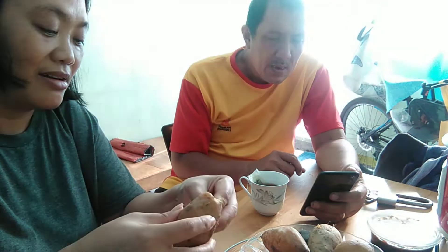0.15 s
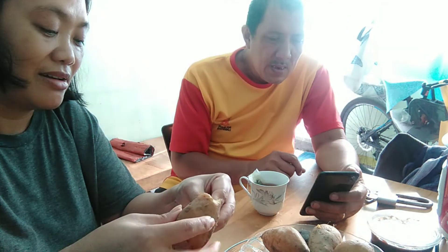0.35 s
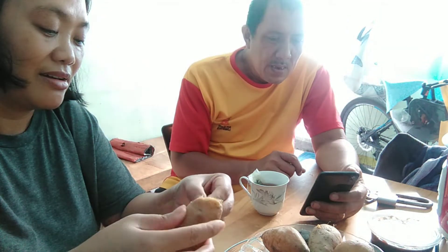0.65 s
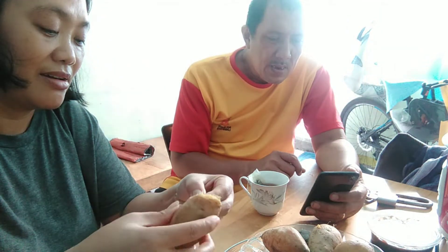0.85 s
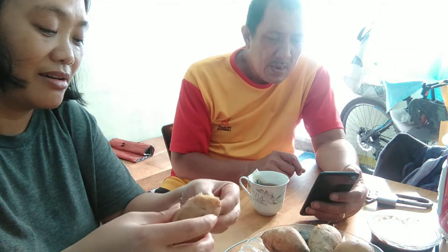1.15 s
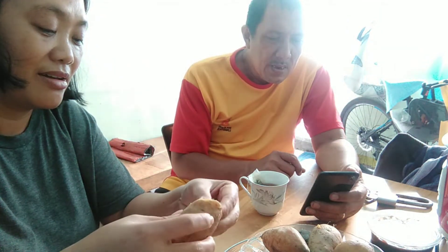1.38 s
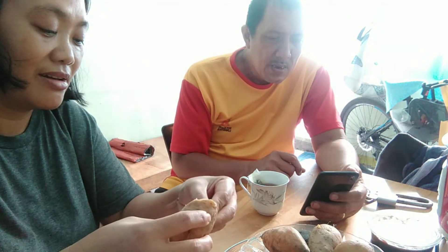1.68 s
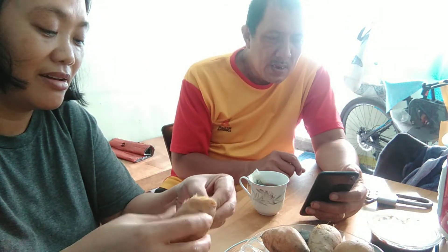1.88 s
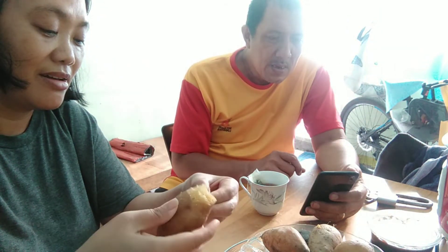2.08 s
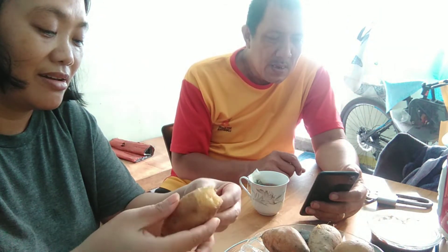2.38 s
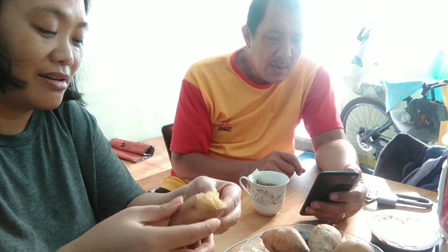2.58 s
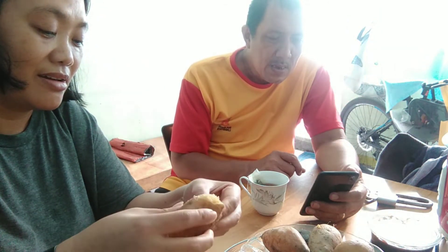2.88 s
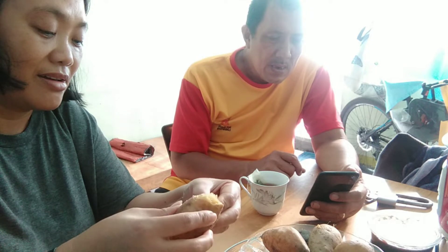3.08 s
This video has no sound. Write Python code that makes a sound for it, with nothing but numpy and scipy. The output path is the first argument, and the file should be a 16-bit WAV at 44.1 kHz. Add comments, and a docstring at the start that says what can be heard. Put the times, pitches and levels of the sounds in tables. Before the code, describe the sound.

A sweet potato being peeled by hand, soft close rustles over a faint room hum.

```python
"""A dry, finely grained hiss comes in strokes: fingers rub and peel the skin off a sweet potato,
at a table in a small room, close to one microphone. The hiss is countless tiny slips of skin on peel,
swelling with pressure and thinning as it eases. A few pushes rasp or scuff; one starts with a tiny
snap and ends in a duller scuff. Behind the hands, a low rumble and a faint hum fill the room."""
import sys
import numpy as np
from scipy import signal
from scipy.fft import rfft, irfft
from scipy.io import wavfile

SR = 44100
rng = np.random.default_rng(int(sys.argv[2]) if len(sys.argv) > 2 else 0)


def store_wav(level_fs):
    """Save 16-bit WAV to argv[1]."""
    pcm = np.round(np.clip(np.atleast_2d(level_fs), -1, 1) * 32767)
    wavfile.write(sys.argv[1], SR, pcm.T.astype(np.int16))


N = 143325

# Skin sliding on peel, heard close up. Each row: frequency in Hz, relative level in dB.
RUB_SPECTRUM = [(500, -15), (1400, -12), (1700, -12.5), (1900, -8), (2300, -9.5), (2850, -9), (3400, -7),
                (4500, -5), (6400, -5.5), (7200, -3), (7450, 0.5), (8450, 1.5), (9300, -4.5), (10300, -9.5),
                (13000, -18.5), (15700, -24)]
# The strokes of the fingers. Each row: start, rise and hold in seconds, fade in dB per second,
# level on gripping and on letting go in dB before thinning, low edge at full pressure in Hz.
FINGER_STROKES = [(-.06, 0.031, 0.047, 90, -53, -52.5, 1670), (0.123, 0.036, 0.099, 68, -46, -40.5, 1570),
                  (0.344, 0.086, 0.095, 39, -48, -47.5, 1710), (0.67, 0.048, .13, 85, -45.5, -42, 1550),
                  (0.902, 0.14, 0.053, 81, -45.5, -47, 1570), (1.249, 0.039, 0.17, 64, -46, -46, 1620),
                  (1.488, 0.056, 0.077, 19, -47.5, -46.5, 1570), (1.867, 0.06, 0.051, 52, -44, -46, 1340),
                  (2.102, .11, 0.09, 73, -49, -50.5, 2400), (2.479, 0.048, .11, 51.5, -45, -44, 1480),
                  (2.614, 0.032, 0.038, 146, -42.5, -42.5, 1180), (2.78, .11, 0.13, 51, -47, -47.5, 1660),
                  (3.221, 0.07, .05, 80, -46.5, -54, 4500)]
def rubbing():
    """The fingers slide over the peel, each stroke with its own pressure."""
    return sum(stroke(pressure(*gesture), edge_hz) for *gesture, edge_hz in FINGER_STROKES)


def stroke(push, edge_hz, thin_db_per_octave=29.5, fizz_hz=11300):
    """A hiss that is broad under full pressure and narrows as the touch gets lighter."""
    frames = dict(fs=SR, nperseg=256, noverlap=192)
    hz, t, hiss = signal.stft(shaped(friction(), colour(RUB_SPECTRUM)), **frames)
    firmness = np.interp(t * SR, np.arange(N), push / push.max())
    ease_db = 20 * np.log10(np.maximum(firmness, .01))
    low_edge_hz = edge_hz * 2 ** (-ease_db / thin_db_per_octave)
    fizz_fade = amp(0.066 * ease_db * highpass(fizz_hz, hz[:, None]))  # the top fades faster
    thinned = hiss * highpass(low_edge_hz, hz[:, None]) * fizz_fade
    return push * signal.istft(thinned, **frames)[1][:N]


def pressure(start, rise, hold, fade, grip_db, release_db, lift_db_per_s2=122):
    """A finger grips, leans into the slide and lets go; the fade steepens as it lifts."""
    t = np.arange(N) / SR - start
    slide_db = np.interp(t, [rise, rise + hold], [grip_db, release_db])
    lift_s = np.clip(t - rise - hold, 0, 1)
    return np.clip(t / rise, 0, 1) * amp(slide_db - fade * lift_s - lift_db_per_s2 * lift_s ** 2)


def friction(catches_per_s=2500, spread_db=3, catch_share=0.16, flutter_db=0.55, flutter_hz=43.6):
    """Countless tiny slips with some larger catches; uneven sliding makes them flutter."""
    size = amp(spread_db * np.minimum(rng.exponential(1, N), 4))
    catches = size * rng.choice([-1, 1], N) * (rng.random(N) < catches_per_s / SR)
    slips = np.sqrt(1 - catch_share) * rng.standard_normal(N) + np.sqrt(catch_share) * unit(catches)
    flutter = noise(1 / (1 + (freqs() / flutter_hz) ** 2))
    return slips * amp(flutter_db * flutter)


# Firm pushes in which the drag rings. Each row: start, rise and hold in seconds,
# fade in dB per second, level on gripping and on letting go in dB, resonance in Hz.
FIRM_PUSHES = [(.22, 0.022, 0.023, 160, -63, -54.5, 3400), (0.493, .012, .015, 300, -62, -64, 2100),
               (2.266, 0.011, 0.0096, 247, -55, -59, 3630), (2.62, 0.016, 0.048, 167, -55, -57.5, 3520)]
def rasping(width_hz=480):
    """Firm pressure brings out a narrow rasp: friction through one resonance."""
    return sum(pressure(*gesture) * shaped(friction(), resonance(hz, width_hz))
               for *gesture, hz in FIRM_PUSHES)


# The dull tone of a dragging finger. Each row: frequency in Hz, relative level in dB.
SCUFF_SPECTRUM = [(250, -26), (480, -1.5), (650, 10.5), (900, 8), (1100, 13), (1300, 7.5), (2200, 2.5),
                  (3500, -24), (7000, -44)]
# The drags. Each row: start, rise and hold in seconds, fade in dB per second,
# level on gripping and on letting go in dB.
FINGER_DRAGS = [(0.202, 0.023, 0.04, 102, -68.5, -67), (.6, 0.037, 0.26, 70, -82, -75),
                (1.478, 0.046, 0.025, 92, -76, -77), (2.626, 0.063, 0.027, 101, -55, -56)]
def scuffing():
    """Now and then a finger drags, its friction strongest in the midrange."""
    return sum(pressure(*drag) for drag in FINGER_DRAGS) * shaped(friction(), colour(SCUFF_SPECTRUM))


def snap(start_s=2.4872, level_db=-44, decay_s=0.0036):
    """A bit of peel gives way with a tiny bright tick."""
    t = np.arange(N) / SR - start_s
    envelope = (t >= 0) * np.exp(-abs(t) / decay_s)
    return amp(level_db) * envelope * noise(resonance(hz=8200, width_hz=2600))


def reflections(x, delay_s=0.004, t60_s=0.15):
    """The near walls send a short diffuse tail back to the microphone."""
    t = np.arange(SR // 2) / SR
    tail = rng.standard_normal(len(t)) * (t > delay_s) * np.exp(-np.log(1000) * t / t60_s)
    return signal.fftconvolve(x, tail / np.linalg.norm(tail))[:N]


# The hum swelling and sinking behind the table. Each row: time in seconds, level in dB before the trim.
HUM_SWELLS = [(0.0, -70), (0.17, -57), (0.55, -63.5), (0.58, -55.5), (1.2, -69.5), (1.28, -60), (1.97, -55),
              (2.06, -63), (2.7, -58.5), (2.71, -69), (3.2, -54), (3.25, -67)]
def hum(hz=99.5, width_hz=10, waver=.7, trim_db=-0.5):
    """A low tone, made to waver by a narrow band of noise around it."""
    t = np.arange(N) / SR
    tone = np.sin(2 * np.pi * (hz * t + rng.random()))
    wavering = unit(tone + waver * noise(resonance(hz, width_hz)))
    return amp(trim_db + np.interp(t, *np.transpose(HUM_SWELLS))) * wavering


# Faint tones far back in the room. Each row: frequency in Hz, width in Hz, level in dB.
ROOM_DRONES = [(159.7, 16, -68), (208.4, 36, -69.5), (477, 7, -83), (603.2, 27, -90.5), (1263, 60, -85)]
def drones():
    """Narrow bands of noise, each heard as a faint pitch."""
    return sum(amp(db) * noise(resonance(hz, width)) for hz, width, db in ROOM_DRONES)


# Room tone at the table. Each row: frequency in Hz, relative level in dB.
RUMBLE_SPECTRUM = [(20, -18), (36, -13), (52, -2.5), (66, 1), (80, -3), (125, -1.5), (190, -8), (260, -11),
                   (330, -17.5), (480, -19.5), (570, -27.5), (680, -38), (820, -25), (1000, -30),
                   (1500, -44.5), (2000, -28), (2700, -55), (4200, -32.5), (6000, -41.5), (8200, -36),
                   (11000, -45), (15000, -49)]
def rumble(level_db=-59.5, drift_db=3, drift_hz=10.7):
    """Low room noise whose bands swell and sink independently."""
    bands = np.zeros(N)
    edges_hz = np.geomspace(20, 20000, 25)
    spectrum = rfft(noise(colour(RUMBLE_SPECTRUM)))
    for lo, hi in zip(edges_hz, edges_hz[1:]):
        band = irfft(spectrum * (freqs() >= lo) * (freqs() < hi), N)
        drift = noise(1 / (1 + (freqs() / drift_hz) ** 4))
        bands += band * amp(drift_db * drift)
    return amp(level_db) * unit(bands)


def amp(db):
    """Decibels to gain."""
    return 10 ** (np.asarray(db) / 20)


def unit(x):
    """Scales to rms 1."""
    return x / np.sqrt(np.mean(x ** 2) + 1e-30)


def freqs():
    """Frequency of each bin in Hz."""
    return np.fft.rfftfreq(N, 1 / SR) + 1e-3


def colour(points):
    """Gain per bin from (Hz, dB) points."""
    hz, db = np.transpose(points)
    return amp(np.interp(np.log(freqs()), np.log(hz), db))


def shaped(x, gain):
    """Filters x by a gain per bin, to rms 1."""
    return unit(irfft(rfft(x) * gain, N))


def noise(gain):
    """Coloured noise of rms 1."""
    return shaped(rng.standard_normal(N), gain)


def resonance(hz, width_hz):
    """Gain per bin of one steep resonance."""
    return 1 / (1 + ((freqs() - hz) / width_hz * 2) ** 2)


def highpass(edge_hz, hz, order=4.1):
    """Gain of a high-pass at the frequencies hz."""
    return 1 / np.sqrt(1 + (edge_hz / (hz + 1)) ** (2 * order))


def scene(reflections_db=-10.5):
    """The hands up close and the room behind them: one microphone, alike in both channels."""
    hands = rubbing() + rasping() + scuffing() + snap()
    walls = amp(reflections_db) * reflections(hands)
    mono = hands + walls + hum() + drones() + rumble()
    return np.array([mono, mono])


def record(dry, hollow_db=-10, cutoff_hz=15800):
    """A hollow in the midrange, then the recorder's band limit."""
    dip = amp(hollow_db * resonance(hz=1070, width_hz=187))
    hollowed = irfft(rfft(dry) * dip, N)
    lowpass = signal.firwin(801, cutoff_hz, window=("kaiser", 9), fs=SR)
    return signal.oaconvolve(hollowed, lowpass[None], "same")


dry = scene()
out = record(dry)
store_wav(out)
```